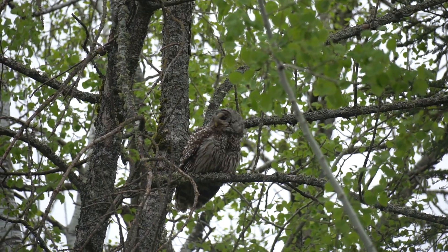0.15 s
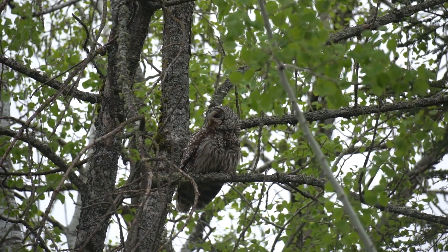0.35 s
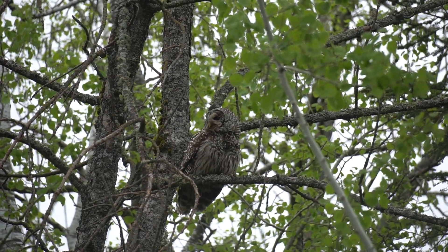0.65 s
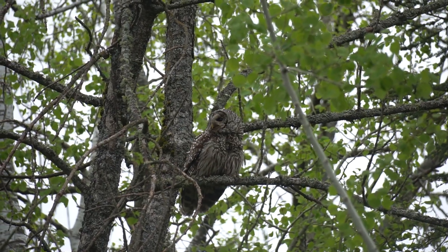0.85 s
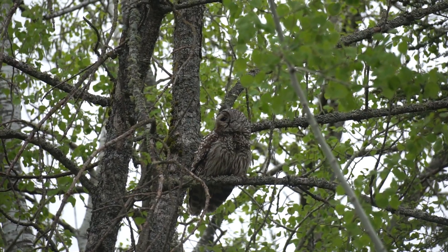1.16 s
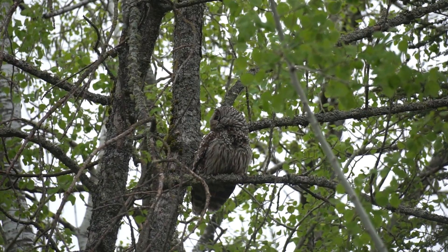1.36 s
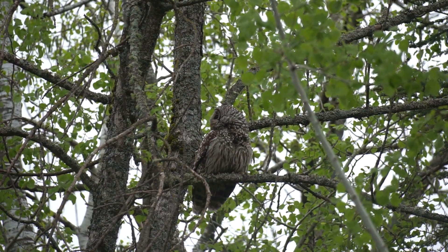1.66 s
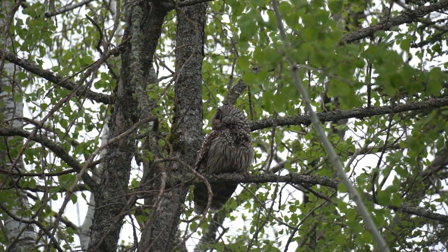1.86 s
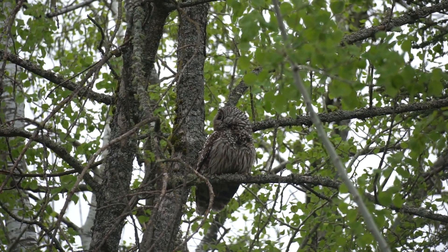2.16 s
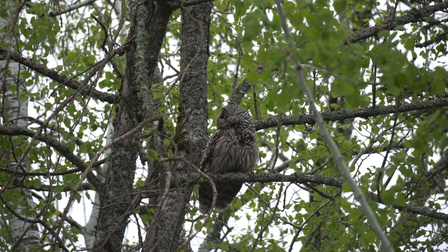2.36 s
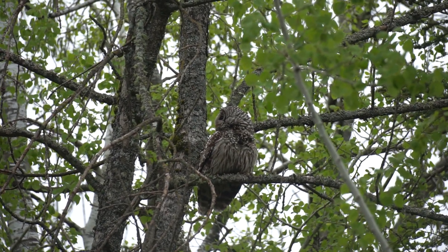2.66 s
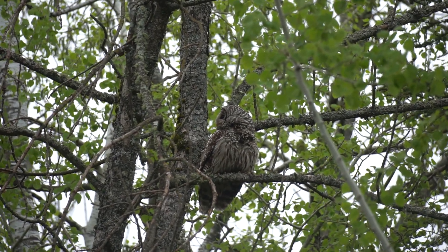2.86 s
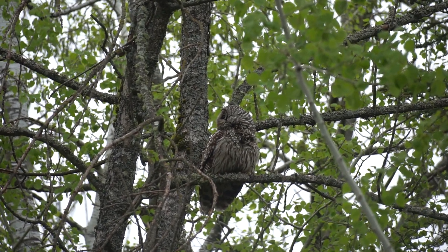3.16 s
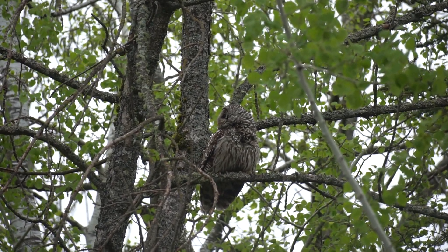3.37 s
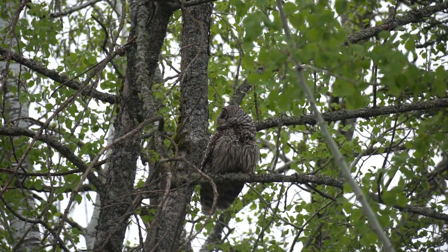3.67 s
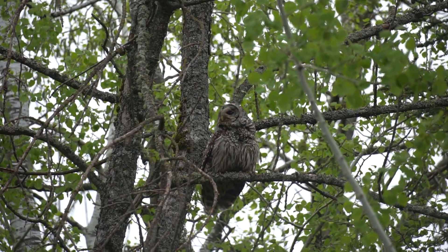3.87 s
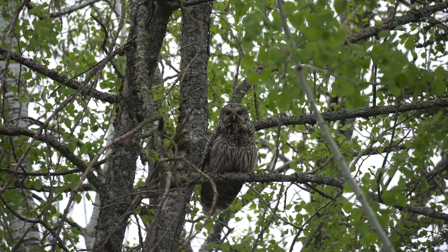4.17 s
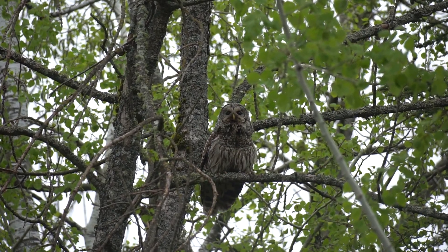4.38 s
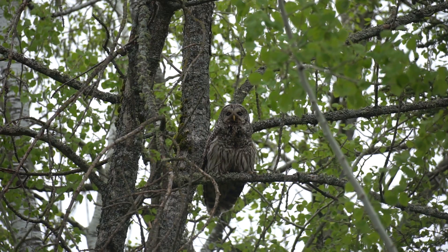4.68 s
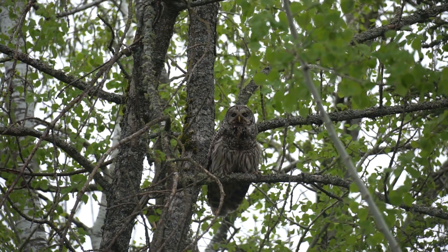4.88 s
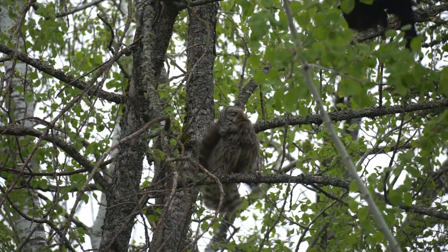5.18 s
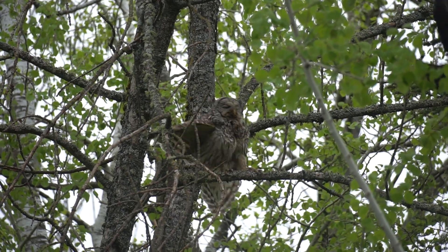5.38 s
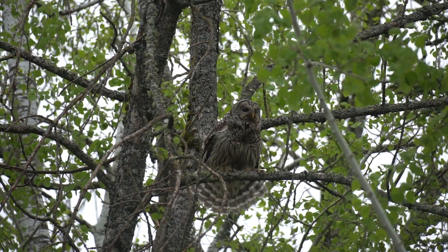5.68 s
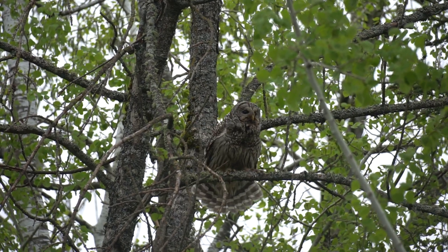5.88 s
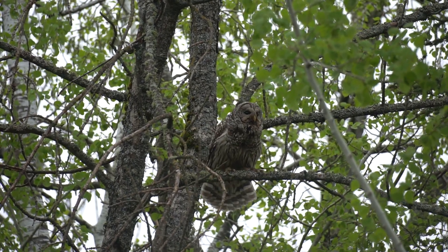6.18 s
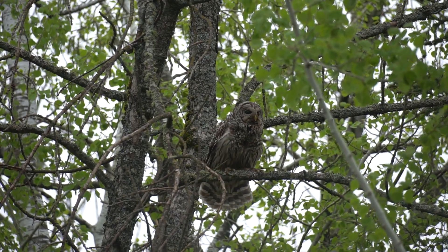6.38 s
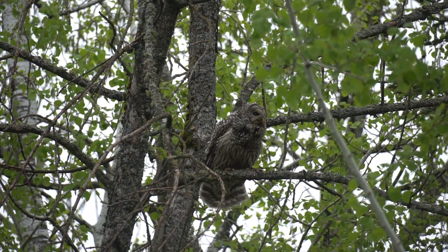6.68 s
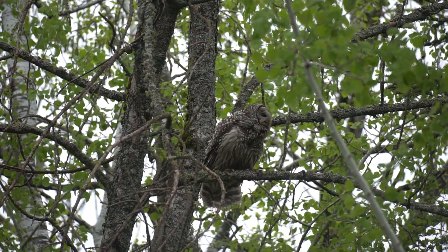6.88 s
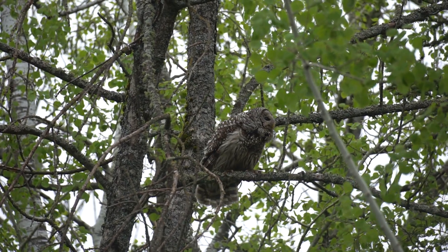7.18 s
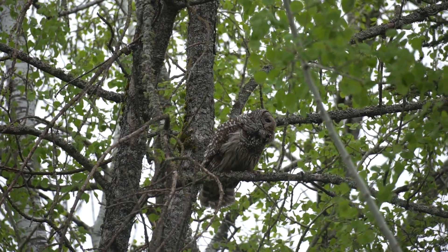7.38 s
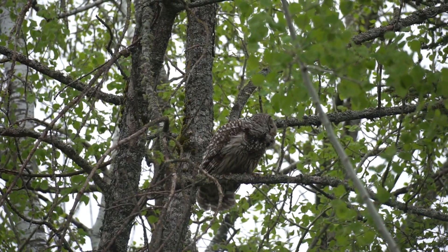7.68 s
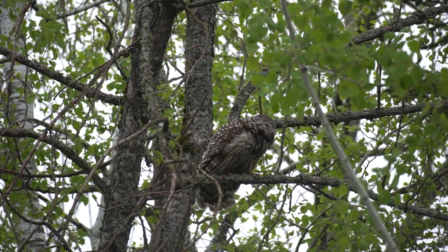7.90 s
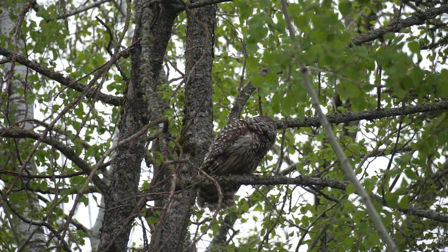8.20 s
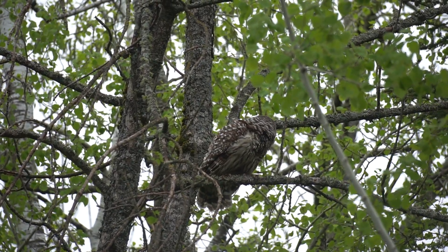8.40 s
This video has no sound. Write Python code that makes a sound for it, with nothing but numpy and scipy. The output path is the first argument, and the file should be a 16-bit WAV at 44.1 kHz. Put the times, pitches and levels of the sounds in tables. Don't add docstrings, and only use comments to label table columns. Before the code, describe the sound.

Quiet leaf hiss, twig ticks and echoing birdsong lead to a loud owl's hooting bout, wing rustle, and four harsh crow caws.

```python
import sys
import numpy as np
from scipy import signal
from scipy.fft import rfft, irfft, next_fast_len
from scipy.io import wavfile
from scipy.ndimage import uniform_filter1d

SR = 44100
rng = np.random.default_rng(int(sys.argv[2]) if len(sys.argv) > 2 else 0)


def volts_from_decibels(level):
    exponent = np.asarray(level, float) / 20
    return 10 ** exponent


def wrap_up_sound(samples):
    columns = np.atleast_2d(samples).T
    tamed = np.clip(columns, -1, 1)
    steps = np.round(tamed * 32767).astype(np.int16)
    wavfile.write(sys.argv[1], SR, steps)


N = 376613
TIME = np.arange(N) / SR

# freq_hz, level_db
LEAF_SPECTRUM = [(15, -60), (25, -42), (102, -18.5), (167, -9.5), (379, -8), (442, -8), (684, 0.5),
                 (819, -0.5), (1140, -8), (1640, -10.5), (2530, -10), (3360, -7.5), (5470, -14),
                 (10600, -16.5), (11500, -15), (15000, -81), (22000, -120)]
# time_s, level_db
ROAD_LEVEL = [(0.0, -78), (0.24, -70), (1.95, -69), (2.47, -84), (3.07, -73), (6.16, -77.5), (6.25, -71),
              (6.63, -80), (7.73, -71), (8.54, -83)]
# freq_hz, width_hz, level_db
ROAD_LINES = [(89, 18, -6), (120.2, 15, -1.5)]
# start_s, peak_db, ring_hz
TICKS = [(0.7103, -39, 4270), (0.7806, -42, 4700), (1.1667, -45.5, 8900), (1.1867, -39, 5500),
         (1.6207, -47, 7500), (3.1652, -34, 4200), (3.5094, -53.5, 4994), (4.6838, -37, 3900),
         (4.7775, -41, 5080), (5.5228, -42.5, 4780), (5.5453, -43, 5360), (5.7792, -39, 4096),
         (8.114, -41, 8300), (1.4621, -47, 6000), (5.1771, -48, 5000)]
# start_s, peak_db, ring_hz
KNOCKS = [(0.8859, -45, 920), (1.0134, -46, 1210), (1.066, -49, 1075), (1.1257, -45, 2060),
          (1.1858, -50, 1943), (1.9033, -48, 1021), (2.3002, -48, 1400), (2.3304, -42.5, 1066),
          (2.329, -51, 2300), (3.1643, -59.5, 2588)]
# start_s, peak_db, ring_hz
THUDS = [
    (1.43, -58, 404),
    (2.03, -63, 270),
    (3.53, -64.5, 122.2),
]
# time_s, middle_hz, level_db
CHORUS = [(0.01, 3070, -42.5), (0.07, 3000, -73), (0.3, 3120, -63), (0.88, 3746, -57.5), (1.64, 3412, -54),
          (1.8, 3104, -49.5), (2.01, 3400, -50), (2.49, 3900, -46.5), (2.642, 3540, -52),
          (2.8, 4030, -45.5), (3.1, 3797, -47), (3.33, 3888, -41.5), (3.55, 4460, -41), (3.94, 4266, -47),
          (4.161, 4460, -97), (4.559, 3430, -66), (4.89, 3176, -50), (4.95, 3080, -69), (5.2, 2887, -76)]
# start_s, length_s, first_hz, last_hz, level_db
SLIDES = [(0.038, 0.016, 3420, 3580, -52), (.051, .012, 3400, 2800, -55), (.06, .024, 2850, 2450, -49),
          (.083, .012, 2450, 3100, -51), (.056, .05, 3550, 3480, -60), (0.105, 0.016, 3500, 3300, -50),
          (.117, .014, 3100, 2500, -53), (0.129, 0.044, 2520, 2280, -56), (.126, .02, 3550, 3350, -58),
          (0.389, 0.017, 6500, 7980, -62), (0.535, 0.02, 6940, 8270, -62.5), (0.89, 0.062, 4010, 3510, -61),
          (1.667, 0.015, 3300, 3600, -55), (1.684, .014, 3500, 3300, -51), (1.743, .018, 3560, 3130, -58),
          (1.764, 0.021, 3610, 2850, -50), (3.159, 0.024, 3520, 2480, -49), (3.193, .02, 2860, 2600, -52),
          (3.216, 0.035, 4330, 3700, -54), (3.331, 0.059, 4200, 4440, -55.5),
          (3.41, 0.1, 4880, 5230, -54.5), (3.532, 0.036, 4700, 3400, -53), (3.579, .035, 2720, 2504, -54),
          (3.696, 0.032, 4400, 3700, -49.5), (3.358, 0.0516, 4700, 5050, -60),
          (3.749, .02, 4140, 4540, -49), (4.466, 0.014, 6000, 7400, -62.5), (4.738, 0.016, 4120, 3490, -57),
          (4.752, 0.029, 3580, 2897, -55), (4.773, .014, 3300, 3605, -62), (4.81, 0.0087, 3000, 4100, -56),
          (.62, 0.032, 3700, 3390, -61), (0.752, 0.028, 3400, 3690, -65), (1.782, .024, 2910, 3120, -52),
          (4.829, 0.032, 2750, 3000, -57.5), (4.862, 0.017, 3530, 3880, -57),
          (4.892, 0.011, 3300, 2800, -51), (7.089, 0.023, 4802, 4595, -57), (7.185, 0.025, 4200, 4854, -65)]
# start_s, length_s, rim_hz, bottom_hz, level_db
DIPS = [
    (1.692, 0.045, 3350, 2330, -55),
    (3.375, 0.056, 2976, 2110, -58),
    (3.72, 0.07, 5320, 5200, -55.5),
]
# start_s, length_s, pitch_hz, level_db
HELD = [(0.095, 0.12, 1930, -67), (0.441, 0.039, 3420, -60.5), (1.813, 0.026, 3230, -53),
        (1.847, .01, 3130, -55), (1.85, 0.095, 2900, -76), (3.185, 0.05, 2490, -62),
        (3.264, .04, 2470, -56), (3.32, 0.056, 2445, -58), (3.235, 0.048, 5300, -51),
        (3.93, .055, 4050, -57), (3.63, 0.13, 3252, -60), (1.645, .022, 4150, -63), (1.894, .04, 3150, -61),
        (2.361, 0.058, 4050, -59), (2.47, 0.029, 4520, -59), (2.57, .06, 3150, -61),
        (2.738, 0.085, 4050, -58), (3.05, 0.022, 4050, -61), (3.872, 0.22, 4723, -61),
        (3.879, 0.05, 4400, -60), (4.876, 0.024, 3890, -55.5), (4.905, .05, 2800, -63),
        (6.804, 0.28, 4525, -71), (6.881, .02, 4720, -62), (7.152, 0.025, 4216, -58),
        (7.222, .05, 2667, -59.5), (7.29, .02, 4280, -57), (7.301, 0.017, 2786, -49),
        (7.324, .05, 2918, -54.5)]
# start_s, length_s, level_db
BUZZES = [
    (2.662, 0.14, -58),
    (3.02, 0.14, -55.5),
    (3.178, .12, -55),
    (3.4, 0.18, -56),
    (3.493, 0.23, -50.5),
]
# start_s, length_s, level_db
FLAPS = [
    (5.023, 0.11, -54),
    (5.165, 0.041, -56),
    (5.325, 0.067, -52.5),
    (5.423, 0.19, -53),
    (5.767, .13, -52),
]

# time_s, pitch_hz, second_partial_db
CAWS = [
    [(7.39, 580, -43.5), (7.402, 610, -30.5), (7.418, 700, -28), (7.432, 763.7, -26), (7.462, 784.7, -26),
     (7.49, 742, -26), (7.51, 661.2, -29), (7.535, 615, -33.5), (7.55, 589, -41)],
    [(7.727, 575, -44), (7.742, 615, -30.5), (7.754, 687, -28.5), (7.766, 752, -26), (7.785, 773, -25.5),
     (7.81, 761.3, -26), (7.832, 719, -26), (7.86, 636.5, -31.5), (7.89, 585, -38)],
    [(8.062, 570, -38), (8.076, 611, -32.5), (8.088, 669.3, -26), (8.098, 729, -28), (8.112, 765, -26),
     (8.138, 759.4, -27), (8.15, 724.6, -28.5), (8.192, 658.3, -29.5), (8.218, 585, -39.5)],
    [(8.404, 575, -38.5), (8.416, 619.5, -31), (8.426, 677, -27), (8.437, 742, -29), (8.46, 752, -27.5),
     (8.485, 733, -28.5), (8.505, 673, -28.5), (8.52, 660, -30.5), (8.534, 620, -46)],
]
# freq_hz, level_db
CROW_THROAT = [(600, -24.5), (1100, -6.5), (1500, 3), (2300, -18.5), (2700, -24.5), (3500, -13.5),
               (4300, -23), (5200, -17.5), (6300, -23), (7000, -31.5), (10000, -42.5)]
# start_s, level_db
CATCHES = [
    (7.548, -33),
    (7.886, -34),
    (8.212, -32),
]
# delay_s, level_db, smear_t60_s, pan_db
CAW_ECHOES = [
    (.108, -17, .05, -8),
    (.165, -17, .06, 3),
    (.235, -18, .08, -3),
]

# freq_hz, level_db
OWL_THROAT = [(500, 0), (900, 0.5), (1300, -15.5), (2000, -1), (2600, 1.5), (3300, 0.5), (4000, 6.5),
              (5500, -21)]
# start_s, length_s, top_hz, level_db, middle_hollow_db
HOOTS = [
    (4.823, 0.072, 633.5, -24, 4),
    (5.489, 0.123, 694.5, -19.5, -9),
    (5.792, 0.12, 685.5, -17.5, -8.5),
    (6.177, 0.12, 666.2, -17.5, -2.5),
    (6.636, .11, 656.8, -18, 0.5),
    (7.08, 0.11, 650.5, -18.5, 1.5),
]
# length_share, top_pitch_share, level_db, hollow_share
HOOT_ARCH = [(0, .77, -6.5, 0), (.13, .92, -2, 0.1), (.26, 0.99, -0.8, 0.13), (.47, 0.99, -1, .95),
             (.65, .975, -0.5, .55), (.82, .92, -3, 0.05), (1.0, .78, -5, 0)]
# time_s, pitch_hz, level_db
OPENING = [(4.372, 443, -41), (4.384, 578, -40), (4.406, 637, -36.5), (4.455, 635, -45), (4.523, 691, -30),
           (4.597, 673, -29.5), (4.633, 601, -33), (4.645, 515, -46)]
# time_s, pitch_hz, level_db
PHRASE_END = [(4.98, 524.7, -18.5), (4.993, 611, -24), (5.038, 660, -21.5), (5.07, 654.4, -23),
              (5.092, 647, -24), (5.109, 543, -20.5)]
# time_s, pitch_hz, level_db
CLOSING = [(7.3, 514, -26.5), (7.32, 619.5, -21), (7.372, 638, -19.5), (7.49, 654.4, -19.5),
           (7.615, 542, -22.5), (7.634, 472.3, -30.5)]
# start_s, length_s, low_hz, level_db
RISES = [(4.785, 0.041, 271, -32), (5.461, .032, 290.3, -35), (5.767, 0.028, 299.7, -32),
         (6.139, .04, 260, -30.5), (6.589, .045, 248.2, -31), (7.03, .052, 233.3, -31)]
# start_s, length_s, low_hz, level_db
FALLS = [(5.108, .022, 286, -41), (5.609, .034, 235, -32), (5.908, .037, 218, -31),
         (6.292, .048, 215, -31.5), (6.745, 0.046, 227, -30.5)]
# start_s, length_s, low_hz, level_db
LINKS = [
    (4.888, .092, 254.8, -35),
    (7.187, .113, 294.7, -34),
]
# length_share, height_share (low pitch to break), first_db, second_db, third_db
RISE_SHAPE = [(0, 0.00475, -38.5, -16, -31), (.32, .42, -11, -4.5, -18.5), (.58, .72, -6, -7.5, -9.5),
              (1.0, 0.99, -4.5, 2.5, -48)]
FALL_SHAPE = [(0, 1.0, 6, -2, -16.5), (.36, .38, -15.5, -10.5, -16), (.68, .2, -17.5, -2.5, -14),
              (1.0, 0.038, -28, -16.5, -30.5)]
LINK_SHAPE = [(0, 0.94, 4, -7, -9.5), (.13, .4, -4, -3.5, -17), (.36, 0.0297, -15.5, 2.5, -10.5),
              (.66, .15, -10, -6, -9.5), (1.0, 0.92, 0, -4.5, -29)]
# time_s, pitch_hz, level_db
SLUR = [(7.632, 467.2, -30.5), (7.646, 420.2, -34), (7.7, 405.5, -37.5), (7.8, 383.4, -37),
        (7.88, 356.4, -40.5), (7.955, 325.5, -38.5), (7.985, 277.3, -39), (8.01, 240, -53)]
# time_s, pitch_hz, level_db
GROAN = [(4.285, 190, -59), (4.299, 214, -41), (4.313, 253.6, -52), (4.33, 282, -33.5), (4.353, 335, -39.5),
         (4.36, 370, -39), (4.373, 428, -31)]
# time_s, overtone_slope_db (per partial)
BEAK = [(4.85, 6), (5.4, 6.5), (7.3, 5.5), (7.632, 5.5), (7.65, 4.5), (7.705, 4), (7.73, 4)]


def unit(x):
    return x / np.sqrt(np.mean(x ** 2))


def colour(table, hz):
    at_hz, db = np.transpose(table)
    return np.interp(np.log(hz), np.log(at_hz), db)


def band(x, hz, width_hz):
    return signal.lfilter(*signal.iirpeak(hz, hz / width_hz, SR), x)


def walk(rate_hz):
    hold = int(SR / rate_hz)
    steps = np.repeat(rng.standard_normal(N // hold + 1), hold)
    return 1.3 * uniform_filter1d(uniform_filter1d(steps, hold), hold)[:N]


def calls(tables, edge_s):
    s, *columns = np.transpose(np.concatenate(tables))
    is_open = sum((TIME >= c[0][0]) & (TIME <= c[-1][0]) for c in tables)
    gate = np.minimum(is_open, 1).astype(float)
    tracks = [gate] + [np.interp(TIME, s, c) for c in columns]
    return [uniform_filter1d(c, int(edge_s * SR)) for c in tracks]


def puffs(table):
    return sum(volts_from_decibels(db) * np.clip(1 - (2 * (TIME - s) / length_s - 1) ** 2, 0, 1) for s, length_s, db in table)


def delay(x, delay_s):
    return np.pad(x, (int(delay_s * SR), 0))[:N]


def place(x, pan_db, lag=0):
    return np.array([np.roll(x, lag) * volts_from_decibels(pan_db / 2), x * volts_from_decibels(-pan_db / 2)])


def wood(x, t60_s, gap_s, side, db, pan_db):
    t = TIME[:2 * SR]
    shape = volts_from_decibels(-60 * t / t60_s) * (1 - np.exp(-(t / gap_s) ** 2))
    mid, other = rng.standard_normal((2, len(t))) * shape
    tail = np.array([mid + side * other, mid - side * other]) * volts_from_decibels([[pan_db / 2], [-pan_db / 2]])
    tail = tail / np.sqrt(np.sum(mid ** 2))
    return volts_from_decibels(db) * signal.fftconvolve(x[None], tail, axes=1)[:, :N]


def leaves():
    out, gust = 0, walk(1.0)
    size = next_fast_len(N)
    bins_hz = np.fft.rfftfreq(size, 1 / SR) + 1
    for hz in 25 * 2 ** np.arange(0, 9, .5):
        share = np.cos(np.pi * np.clip(np.log2(bins_hz / hz), -.5, .5)) * volts_from_decibels(colour(LEAF_SPECTRUM, bins_hz))
        mid, side = irfft(rfft(rng.standard_normal((2, N)), size) * share)[:, :N]
        width = min(.22 + hz / 3500, .85)
        flicker = volts_from_decibels(.5 * gust + 0.18 * walk(7.7))
        out = out + flicker * (mid + width * side * np.array([[1], [-1]]))
    return unit(out) * volts_from_decibels(-52)


def road():
    hum = 0
    for hz, width_hz, db in ROAD_LINES:
        line = band(band(rng.standard_normal(N), hz, width_hz), hz, 2 * width_hz)
        hum = hum + volts_from_decibels(db) * unit(line)
    return unit(hum) * volts_from_decibels(np.interp(TIME, *np.transpose(ROAD_LEVEL)))


def hits(table, t60_s, rise_s, noisy, db):
    out, t = np.zeros(N + 8192), TIME[:8192]
    shape = volts_from_decibels(-60 * t / t60_s) * (1 - np.exp(-t / rise_s))
    for s, peak_db, hz in table:
        crack = band(rng.standard_normal(len(t)), hz, 0.6 * hz)
        ring = np.sin(2 * np.pi * hz * t) + noisy * crack
        out[int(s * SR):][:len(t)] += volts_from_decibels(peak_db + db) * ring * shape
    return place(out[:N], 0.65)


def twigs():
    ticks = hits(TICKS, t60_s=0.0066, rise_s=0.00045, noisy=6.0, db=-3.0)
    knocks = hits(KNOCKS, t60_s=0.026, rise_s=0.001, noisy=9.1, db=-1.5)
    return ticks + knocks + hits(THUDS, t60_s=0.36, rise_s=0.014, noisy=.3, db=8.5)


def thrush_chorus():
    s, hz, db = np.transpose(CHORUS)
    hz, db = np.interp(TIME, s, hz), np.interp(TIME, s, db, right=-120)
    chorus = 0
    for shift_oct, level_db in ((-.5, -11.5), (-.3, -6), (-.13, -3.5), (.04, -1.5), (.2, -3.5), (.4, -3.5)):
        level = volts_from_decibels(db + level_db + 5 * walk(45))
        pitch_hz = np.minimum(hz * 2 ** shift_oct, 4910) * 2 ** (.07 * walk(170))
        chorus = chorus + level * np.sin(2 * np.pi * np.cumsum(pitch_hz) / SR)
    tail = wood(chorus, t60_s=0.82, gap_s=0.012, side=1.0, db=-10, pan_db=1.5)
    return tail + place(chorus * volts_from_decibels(-16), 1.5)


def whistles():
    slides = [(s, length_s, a, (a + b) / 2, b, db) for s, length_s, a, b, db in SLIDES]
    dips = [(s, length_s, rim, low, rim, db) for s, length_s, rim, low, db in DIPS]
    return slides + dips + [(s, length_s, hz, hz, hz, db) for s, length_s, hz, db in HELD]


def songbirds():
    notes, tremble, warble = np.zeros(N), volts_from_decibels(2.2 * walk(150)), 1 + .007 * walk(170)
    for s, length_s, *bend_hz, db in whistles():
        n, i = int(length_s * SR), int(s * SR)
        bend = np.polyfit([0, .5, 1], bend_hz, 2)
        hz = np.polyval(bend, np.linspace(0, 1, n)) * warble[i:i + n]
        tone = np.sin(2 * np.pi * np.cumsum(hz) / SR)
        notes[i:i + n] += volts_from_decibels(db) * signal.windows.tukey(n, .35) * tone * tremble[i:i + n]
    near = wood(notes, t60_s=0.09, gap_s=0.003, side=0.7, db=-9.0, pan_db=1.5)
    far = wood(notes, t60_s=0.97, gap_s=0.005, side=0.95, db=1.0, pan_db=6.0)
    return near + far + 2.0 * place(notes, 1.9)


def buzz():
    hz, width_hz = 5900, 1600
    rasp = band(band(rng.standard_normal((2, N)), hz, width_hz), hz, width_hz)
    return volts_from_decibels(2.0 * walk(98)) * puffs(BUZZES) * unit(rasp)


def wings():
    rustle = unit(band(rng.standard_normal((2, N)), 2800, 8500))
    return puffs(FLAPS) * volts_from_decibels(walk(120)) * rustle


def catches():
    length_s, first_hz, last_hz = 0.0317, 1602, 1351
    t = np.arange(int(length_s * SR)) / SR
    note = np.sin(np.pi * t / length_s) * signal.chirp(t, first_hz, length_s, last_hz)
    out = np.zeros(N)
    for s, db in CATCHES:
        out[int(s * SR):][:len(t)] += np.sqrt(2) * volts_from_decibels(db) * note
    return out * volts_from_decibels(1.5 * walk(200))


def crow_air():
    bins_hz = np.fft.rfftfreq(N, 1 / SR) + 1
    shape = volts_from_decibels(colour(CROW_THROAT, bins_hz) + 3.5 * np.log2(bins_hz))
    low_cut = 1 + (2200 / bins_hz) ** 8
    return unit(irfft(rfft(rng.standard_normal(N)) * shape / low_cut, N))


def crow_voice():
    gate, hz, level_db = calls(CAWS, 0.0042)
    flutter = np.sin(2 * np.pi * np.cumsum(66 * (1 + .12 * walk(40))) / SR)
    flutter_depth = .02 + .004 * np.clip(-26 - level_db, 0, 5)
    hz = hz * (1 + flutter_depth * flutter + .01 * walk(400))
    phase = 2 * np.pi * np.cumsum(hz) / SR
    stack = 0
    for k in range(1, 13):
        effort_db = .25 * max(k - 2, 0) * (level_db + 27.5)
        partial_db = colour(CROW_THROAT, k * hz) + effort_db - 1.3 * max(k - 3, 0) + 0.4 * k * walk(140)
        stack = stack + volts_from_decibels(partial_db) * np.sin(k * phase)
    stack = np.sqrt(2) * stack * (1 + 0.13 * flutter) * gate * volts_from_decibels(level_db)
    breath = delay(gate * volts_from_decibels(.6 * level_db - 10.5), 0.001)
    return stack + volts_from_decibels(-20) * crow_air() * (1 + 0.29 * flutter) * breath + catches()


def crow():
    voice = crow_voice()
    stirred = voice * np.sqrt(2) * np.cos(np.pi / 4 + .9 * walk(160))
    slap = sum(wood(delay(stirred, s), t60_s, gap_s=0.0021, side=0.4, db=db, pan_db=pan_db)
               for s, db, t60_s, pan_db in CAW_ECHOES)
    treble = signal.lfilter(*signal.butter(2, 2800, "high", fs=SR), stirred)
    haze = wood(treble, t60_s=0.6, gap_s=0.07, side=0.9, db=-4, pan_db=-3.0)
    tail = wood(stirred, t60_s=0.98, gap_s=0.024, side=0.74, db=-6.0, pan_db=3.5)
    return place(voice, -13, lag=2) * volts_from_decibels(-1.5) + slap + haze + tail


def clear_note(s, hz, db, hollow_db=0):
    second_db = db - 18.5 + colour(OWL_THROAT, 2 * hz) + 0.64 * hollow_db
    bloom_db = 0.045 * (hz - hz.max())
    third_db = db - 25 + bloom_db + 0.88 * np.minimum(db - db.max() + 2.0, 0)
    return np.transpose([s, hz, db + hollow_db, second_db, third_db])


def head_notes():
    share, height, arch_db, hollow = np.transpose(HOOT_ARCH)
    hoots = [clear_note(s + share * length_s, height * hz, db + arch_db, hollow * dip_db)
             for s, length_s, hz, db, dip_db in HOOTS]
    held = [clear_note(*np.transpose(note)) for note in (OPENING, PHRASE_END, CLOSING)]
    return sorted(hoots + held, key=lambda note: note[0, 0])


def chest_glides():
    break_hz, notes = 479.3, []
    for shape, rows in ((RISE_SHAPE, RISES), (FALL_SHAPE, FALLS), (LINK_SHAPE, LINKS)):
        share, height, *partial_db = np.transpose(shape)
        for s, length_s, hz, db in rows:
            glide_hz = hz + height * (break_hz - hz)
            notes.append(np.transpose([s + share * length_s, glide_hz, *(db + np.array(partial_db))]))
    return sorted(notes, key=lambda note: note[0, 0])


def slur():
    at_s, hz, db = np.transpose(SLUR)
    s = np.linspace(at_s[0], at_s[-1], num=80)
    quaver = 1 + 0.0307 * np.cos(2 * np.pi * 15.2 * (s - 7.68))
    hz = np.interp(s, at_s, hz) * quaver
    db = np.interp(s, at_s, db)
    first_db = db + 0.1 * np.minimum(hz - 369, 0)
    return np.transpose([s, hz, first_db, db, db - 9.5])


def groan():
    s, hz, db = np.transpose(GROAN)
    octaves = np.log2(np.outer(range(1, 4), hz) / 580)
    loss_db = np.maximum(-14.5 * octaves, 21 * octaves)
    return np.transpose([s, hz, *(db - loss_db)])


def owl_voice(tables, edge_s, jitter, rough_db, tilt_db, effort, glide_db, order):
    gate, hz, *partial_db = calls(tables, edge_s)
    smooth_hz = uniform_filter1d(hz, int(edge_s * SR))
    phase = 2 * np.pi * np.cumsum(smooth_hz * (1 + jitter * walk(250))) / SR
    glide = np.abs(np.gradient(np.log(hz)) * SR)
    slope_db = tilt_db - effort * (partial_db[0] + 24.0) + glide_db * glide
    lead_db = partial_db[order - 1] - colour(OWL_THROAT, order * hz)
    for k in range(4, 10):
        even_drop_db = 2.5 * (order % 2) * (1 - k % 2)
        over_db = lead_db + colour(OWL_THROAT, k * hz) - slope_db * (k - order) - even_drop_db
        partial_db.append(over_db)
    gate = np.sin(np.pi / 2 * np.clip(2 * gate - 1, 0, 1)) ** 2
    stack = sum(volts_from_decibels(db + rough_db * k ** .5 * walk(90)) * np.sin(k * phase)
                for k, db in enumerate(partial_db, 1))
    return np.sqrt(2) * gate * stack


def owl():
    chest_notes = [groan()] + chest_glides() + [slur()]
    beak_db = np.interp(TIME, *np.transpose(BEAK))
    chest = owl_voice(chest_notes, edge_s=.011, jitter=.02, rough_db=2.2, tilt_db=beak_db,
                      effort=0.011, glide_db=0.0, order=2)
    head = owl_voice(head_notes(), edge_s=.021, jitter=0.0024, rough_db=1.0, tilt_db=9.5,
                     effort=0.45, glide_db=1.0, order=3)
    voice = chest + head
    near = wood(chest, t60_s=0.14, gap_s=0.0051, side=0.25, db=-7.5, pan_db=1.5)
    far = wood(band(voice, 450, 1600), t60_s=1.13, gap_s=.035, side=0.3, db=-15.0, pan_db=1.2)
    return place(voice, -1.8) + near + far


def scene():
    bed = leaves() + road() + twigs()
    birds = thrush_chorus() + songbirds() + buzz()
    return bed + birds + wings() + crow() + owl()


def low_pass(x):
    return signal.sosfilt(signal.butter(12, 12280, fs=SR, output="sos"), x)


def record(dry):
    top_cut = signal.ellip(8, .2, 60, 11050, fs=SR, output="sos")
    mix = signal.sosfilt(top_cut, dry)
    return low_pass(mix)


dry = scene()
out = record(dry)
wrap_up_sound(out)
```